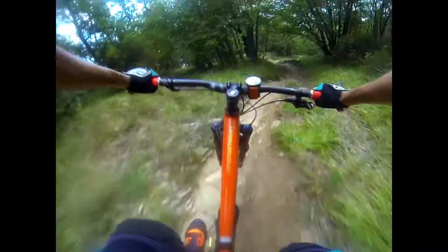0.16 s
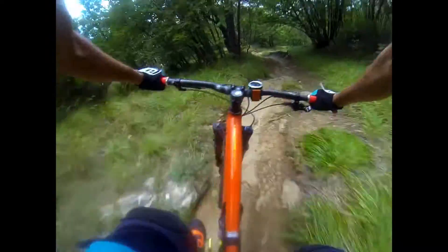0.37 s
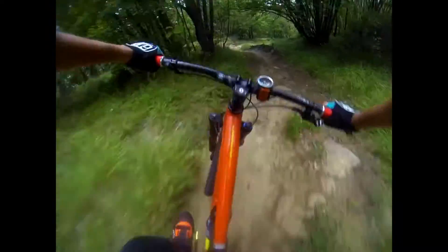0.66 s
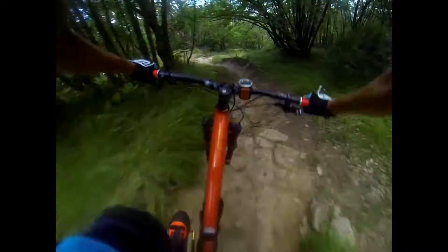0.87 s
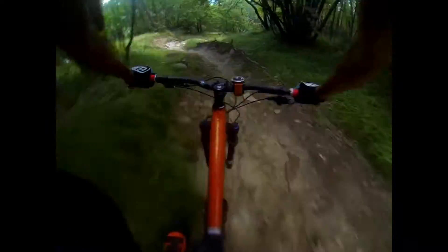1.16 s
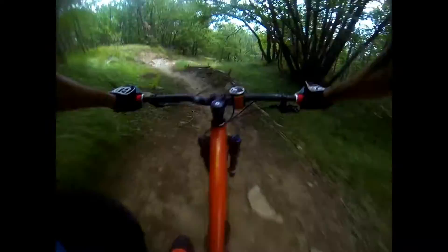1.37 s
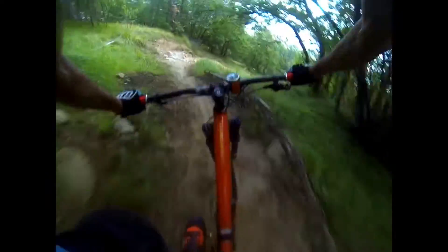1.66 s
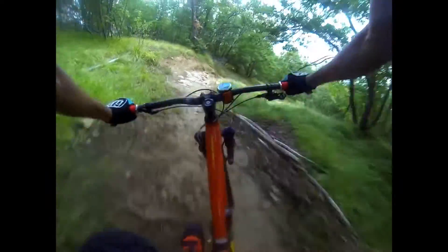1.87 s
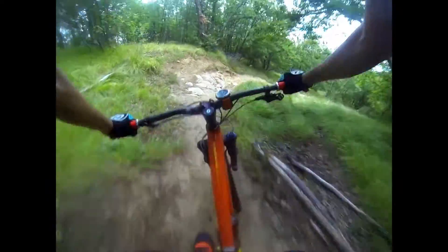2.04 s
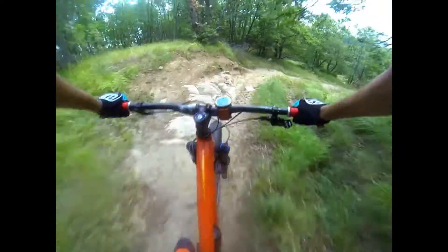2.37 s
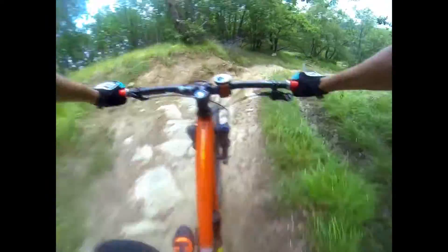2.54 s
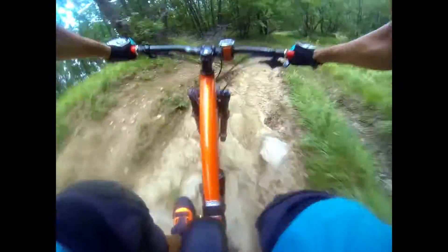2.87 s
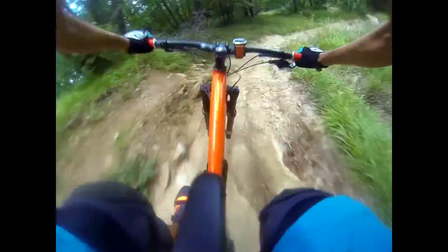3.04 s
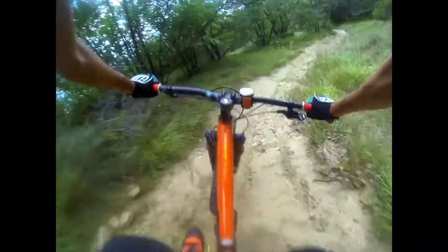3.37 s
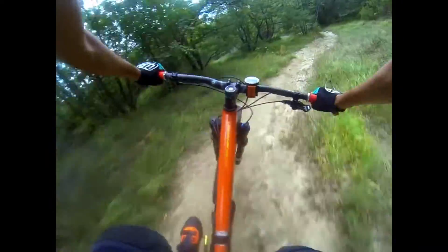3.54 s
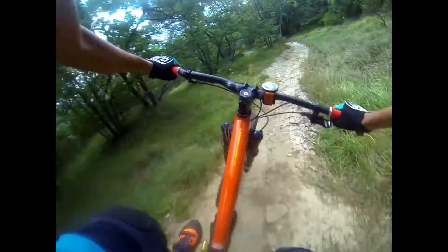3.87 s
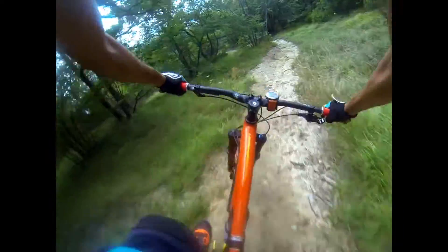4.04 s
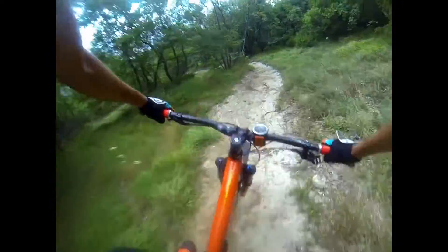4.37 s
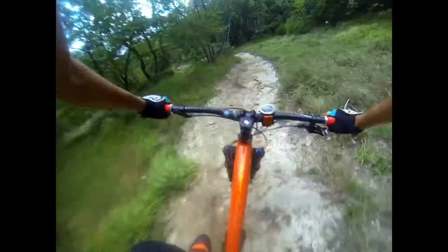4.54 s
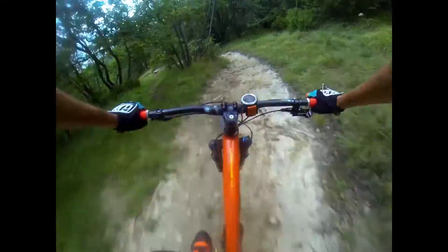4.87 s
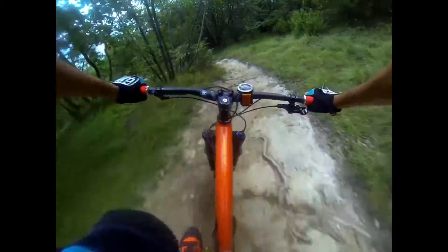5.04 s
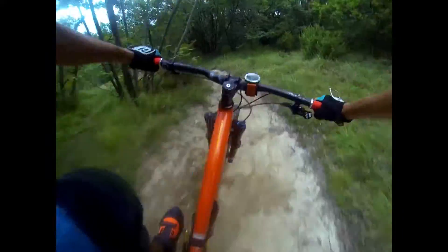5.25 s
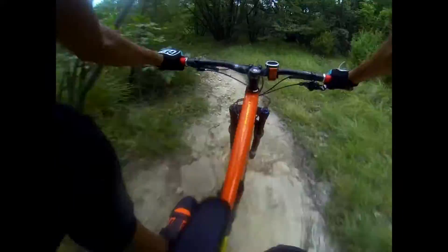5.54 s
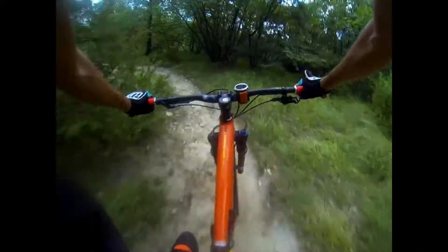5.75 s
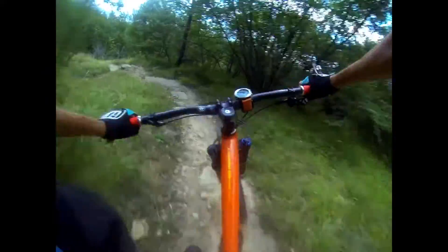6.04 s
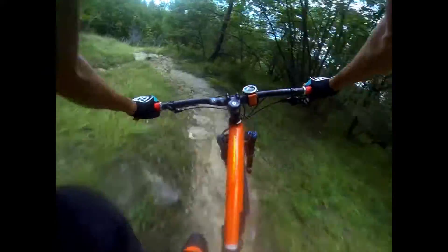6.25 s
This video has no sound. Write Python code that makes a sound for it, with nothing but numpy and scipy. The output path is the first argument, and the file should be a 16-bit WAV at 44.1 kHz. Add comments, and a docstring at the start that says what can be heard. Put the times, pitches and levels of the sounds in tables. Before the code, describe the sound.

A mountain bike speeds down a stony dirt trail, heard closely from a housed microphone on the rider's chest. From 0 to 1.8 s, frame thuds and chain clacks come in quick irregular clusters over rolling tyres, crunching grit and pebble flicks; the hub buzzes briefly at 0.2 s. Around 2 to 2.8 s knocks soften, with another faint buzz. At 2.9 s a landing hits hard with a short low-mid boom, a brief frame hum and more rattling until 3.8 s; a tiny high brake ting and hub buzzes come near 3.5 to 3.8 s. From 3.9 to 4.6 s wind dominates, fluttering strongest near 4.4 s. Scattered knocks follow, then a dense clatter at 5.6 to 5.95 s, easing to tyre roll and rising wind by 6.4 s. Single deep buffets thump near 0.5, 1, 1.9, 4.6, 4.8 and 5.3 s. Open air, dry, slightly boxy.

```python
"""A mountain bike clatters at speed down a rocky dirt trail: chain and frame knock on the stones.
The microphone sits in a camera housing on the rider's chest, close above the bike, in open air.
Knocks are sprays of contacts driven into ringing parts; tyres and grit are coloured random clicks.
The freehub buzzes in spells, the frame hums after a landing and a brake rotor tings, all resonances.
Behind it all wind rumbles and flutters as shaped noise, with a few single large buffets."""
import sys
import numpy as np
from scipy import signal
from scipy.fft import rfft, irfft, next_fast_len
from scipy.io import wavfile
from scipy.ndimage import uniform_filter1d

SR = 44100
rng = np.random.default_rng(int(sys.argv[2]) if len(sys.argv) > 2 else 0)


def master_out(mix):
    """Clip the mix to full scale and print it as 16-bit PCM to the path in sys.argv[1]."""
    frames = np.transpose(np.atleast_2d(mix))
    ceiling = np.clip(frames, -1, 1)
    pcm = np.round(ceiling * 32767).astype(np.int16)
    wavfile.write(sys.argv[1], SR, pcm)


N = 282681
TIME = np.arange(N) / SR


def from_db(db):
    """Decibels to gain."""
    return 10 ** (np.asarray(db) / 20)


def rms_one(x):
    """Scale to unit power."""
    return x / np.sqrt(np.mean(x ** 2) + 1e-20)


def in_time(rows):
    """Each level column of a table, interpolated to every sample."""
    s, *columns = np.transpose(rows)
    return [np.interp(TIME, s, column) for column in columns]


def drift(rate_hz):
    """Random wander of unit power, with straight lines between chance points."""
    knots = rng.standard_normal(4096)
    return rms_one(np.interp(TIME * rate_hz, np.arange(len(knots)), knots))


def colour(x, points):
    """Causal (minimum-phase) filter with the given spectrum, falling steeply past its ends."""
    size = next_fast_len(len(x) + 4096)
    size += size % 2
    hz, db = np.transpose(points)
    octave = np.log2(np.maximum(np.fft.rfftfreq(size, 1 / SR), 1))
    outside = np.abs(octave - np.clip(octave, np.log2(hz[0]), np.log2(hz[-1])))
    # 18 dB per octave past the ends, for up to three octaves
    spectrum_db = np.interp(octave, np.log2(hz), db) - 18 * np.minimum(outside, 3)
    cepstrum = irfft(np.log(from_db(spectrum_db)))
    # folding the cepstrum forward makes the filter minimum-phase
    cepstrum[1:size // 2] *= 2
    cepstrum[size // 2 + 1:] = 0
    return irfft(rfft(x, size) * np.exp(rfft(cepstrum)))[:len(x)]


def resonate(x, hz, width_hz):
    """One resonance with unit gain on top."""
    r = np.exp(-np.pi * width_hz / SR)
    feed = np.array([1, 0, -1]) * (1 - r * r) / 2
    return signal.lfilter(feed, [1, -2 * r * np.cos(2 * np.pi * hz / SR), r * r], x)


def steady(x, span_s):
    """Even out the level over a short span."""
    size = max(int(span_s * SR), 2)
    power = uniform_filter1d(uniform_filter1d(x * x, size), size)
    return x / np.sqrt(np.abs(power) + 1e-12)


def grains(per_s, spread_db, largest):
    """Random clicks of uneven size, up to a largest one, scaled to unit power."""
    sizes = from_db(spread_db * np.minimum(rng.exponential(1, N), largest))
    sizes = sizes * rng.choice([-1, 1], N)
    return rms_one(sizes * (rng.random(N) < per_s / SR))


def spell(start_s, length_s, attack_s, release_s):
    """An envelope that rises, holds and dies away."""
    age = TIME - start_s
    return np.clip(age / attack_s, 0, 1) * np.exp(-np.clip((age - length_s) / release_s, 0, 20))


def clatter(rows, shares, points, t60, crack, rebounds_per_s, ring_db):
    """Each knock is a brief graze, a main contact and a dying spray of rebounds into ringing parts."""
    size, lead = 6144, 256  # samples; the main contact comes after the lead
    age, out = np.arange(size) / SR, np.zeros(N + size)
    since = age - lead / SR
    impulse = 1. * (age == 0)
    body = rfft(colour(impulse, points), 2 * size)
    for (s, rattle_s, db, ring_hz), share in zip(rows, shares):
        force = np.exp(np.where(since < 0, since / 0.0017, -since / max(rattle_s, .001)))
        contacts = rng.choice([-1, 1], size) * rng.uniform(0.54, 1.8, size)
        contacts = contacts * (rng.random(size) < rebounds_per_s / SR) * force
        contacts[lead] = 1
        # a sharp crack, then noise that dies by 60 dB in t60 seconds
        ringing = rng.standard_normal(size) * from_db(-60 * age / t60)
        ringing[0] += crack
        struck_part = impulse + from_db(ring_db) * resonate(impulse, ring_hz, width_hz=160)
        knock = rfft(contacts, 2 * size) * rfft(ringing, 2 * size) * rfft(struck_part, 2 * size)
        knock = irfft(knock * body)[:size]
        at = int(s * SR) - lead
        # a knock's level is its energy spread over a hundredth of a second
        out[at:at + size] += share * from_db(db) * knock / np.sqrt(np.sum(knock ** 2) / (SR / 100))
    return out[:N]


# small knocks between the large ones; level over that of the tyre roll
JIGGLE_OVER_ROLL_DB, JIGGLE_SPREAD_DB = 4, 2
JIGGLE_MEAN_RATTLE_S, JIGGLE_RING_HZ = .005, (800, 2400)


def jiggles(count):
    """Small knocks at chance moments: rows like those of the large ones."""
    when, rattle, size, part = rng.random((count, 4)).T
    s = (np.arange(count) + when) / count * (TIME[-1] - .02) + .01
    roll_db = np.interp(s, TIME, in_time(TRAIL)[0])
    db = roll_db + JIGGLE_OVER_ROLL_DB + JIGGLE_SPREAD_DB * (2 * size - 1)
    low, high = JIGGLE_RING_HZ
    return np.transpose([s, JIGGLE_MEAN_RATTLE_S * (.5 + rattle), db, low * (high / low) ** part])


# chain and frame on the larger stones, close below the microphone:
# [t/s, rattle time/s, level before trims/dB, ring of the struck part f/Hz]
KNOCKS = [(.109, 0.012, -14, 800), (.206, 0.005, -27.5, 1730), (.225, 0.018, -15.5, 1800),
          (.272, 0.013, -18, 1750), (.535, 0.016, -22, 780), (.699, 0.032, -15, 1290),
          (.713, 0.0021, -12, 1000), (.7747, .003, -15.5, 1860), (.8087, 0.0068, -19.5, 1660),
          (.944, .007, -21, 580), (1.081, .007, -16.5, 1920), (1.093, .002, -20, 1500),
          (1.199, 0.014, -19, 1540), (1.2432, .002, -15, 1550), (1.257, 0.0046, -22, 2000),
          (1.31, 0.0064, -14.5, 1460), (1.318, 0.014, -17, 1420), (1.351, 0.011, -15.5, 1600),
          (1.382, 0.0025, -17.5, 785), (1.4143, 0.013, -24.5, 800), (1.4901, .0015, -29, 1890),
          (1.563, 0.027, -16, 900), (1.638, .012, -12, 714), (1.658, .016, -15, 940),
          (1.698, .018, -12, 1030), (1.8134, 0.0015, -19, 746), (2.116, 0.033, -25.5, 2320),
          (2.459, .012, -26.5, 910), (2.496, 0.024, -24.5, 870), (2.7298, 0.0036, -25, 1820),
          (2.7722, 0.0032, -23.5, 2090), (2.867, 0.012, -24.5, 1710), (2.9343, 0.013, -10.5, 1200),
          (2.946, 0.038, -12, 550), (3.018, 0.026, -24, 573), (3.05, 0.022, -14.5, 2000),
          (3.068, .018, -14, 1620), (3.243, .007, -20, 690), (3.28, 0.025, -17.5, 800),
          (3.297, 0.018, -11.5, 850), (3.4726, 0.0061, -25, 1170), (3.549, 0.016, -16.5, 810),
          (3.614, 0.017, -24, 760), (3.7026, 0.023, -14, 1710), (3.791, 0.023, -16.5, 600),
          (3.826, 0.0071, -24, 1200), (3.9196, .009, -30.5, 1390), (4.467, 0.0043, -31.5, 2000),
          (4.6489, 0.0087, -20, 1570), (4.6983, 0.053, -19, 810), (4.891, 0.0039, -15, 1480),
          (4.9772, 0.028, -17.5, 1210), (5.298, 0.0089, -20.5, 656), (5.5519, 0.032, -21.5, 900),
          (5.6651, 0.026, -13, 1700), (5.711, 0.021, -13.5, 1440), (5.757, .012, -10, 1570),
          (5.765, 0.005, -14, 1580), (5.7973, 0.012, -16.5, 1380), (5.8821, 0.0095, -11, 1050),
          (5.9176, 0.04, -15, 1030), (5.935, 0.017, -13, 1750), (6.0383, .008, -30, 2100),
          (6.0976, 0.0076, -25, 846)]
# spectra of frame thud, chain clack and bright tick: [f/Hz, relative level/dB]
THUD_COLOUR = [(200, -12.5), (380, 6), (570, 4.5), (720, 4.5), (1000, 5.5), (1300, -9.5), (1800, -27.5)]
CLACK_COLOUR = [(800, -13.5), (1250, 0.5), (1600, 2), (1950, 3.5), (2400, -7), (2900, -11.5), (3800, -25.5),
                (6000, -46)]
TICK_COLOUR = [(2200, 0.5), (2800, 6), (3800, 0), (5200, -5.5), (7000, -11), (9000, -6), (12000, -19),
               (15000, -25)]
# parts that ring lower mostly thud, higher ones mostly clack
EVEN_RING_HZ, LEAN_DB_PER_OCTAVE = 1310, 9.5
THUD_DB, CLACK_DB, TICK_DB = -0.3, -0.2, -26.5   # trims against a knock's level


def knocks():
    """The frame thuds, the chain clacks against the stay, links tick; the struck part sets the balance."""
    rows = np.vstack([KNOCKS, jiggles(count=40)])
    lean = from_db(LEAN_DB_PER_OCTAVE * np.log2(rows[:, 3] / EVEN_RING_HZ))
    # the two shares add up to the same power whatever the lean
    thud_share, clack_share = 1 / np.hypot(1, lean), lean / np.hypot(1, lean)
    thud = clatter(rows, thud_share, THUD_COLOUR, t60=0.027, crack=11.8, rebounds_per_s=560, ring_db=1.5)
    clack = clatter(rows, clack_share, CLACK_COLOUR, t60=0.02, crack=11.8,
                    rebounds_per_s=700, ring_db=3.0)
    tick = clatter(rows, np.ones(len(rows)), TICK_COLOUR, t60=0.024, crack=4,
                   rebounds_per_s=900, ring_db=-3)
    return from_db(THUD_DB) * thud + from_db(CLACK_DB) * clack + from_db(TICK_DB) * tick


# stones crack against rim and frame: [t/s, level/dB]
STONES = [(.706, -38), (.7747, -26.5), (1.166, -36.5), (1.2432, -35.5), (1.316, -32.5), (1.38, -38),
          (1.58, -39), (1.654, -36), (2.936, -32.5), (3.092, -41), (3.147, -39), (3.214, -31),
          (3.53, -36.5), (4.286, -33), (4.361, -43), (4.9772, -34.5)]
STONE_RATTLE_S, STONE_RING_HZ = 0.0076, 2000


def stone_cracks():
    """A flung stone gives a short, bright tick."""
    rows = [(s, STONE_RATTLE_S, db, STONE_RING_HZ) for s, db in STONES]
    return clatter(rows, np.ones(len(rows)), TICK_COLOUR, t60=0.02, crack=3,
                   rebounds_per_s=1200, ring_db=-6)


# range of pebble pitches: [lowest f/Hz, highest f/Hz]
PEBBLE_PITCH_HZ = (692, 3130)


def pebbles(per_s, spread_db, ring_cycles, count):
    """Small stones flick against tyres and frame, each ringing at one of a set of pitches."""
    clicks, dealt = grains(per_s, spread_db, largest=1.9), rng.integers(0, count, N)
    pitches = np.geomspace(*PEBBLE_PITCH_HZ, count)
    rings = sum(resonate(clicks * (dealt == k) + 1e-18, hz, hz / ring_cycles) / hz
                for k, hz in enumerate(pitches))
    return rms_one(signal.sosfilt(signal.butter(2, 3200, fs=SR, output="sos"), rings))


# tyres on the ground: [t/s, roll level on hard dirt before trims/dB, loose grit level before trims/dB]
TRAIL = [(0, -34.5, -51), (.6, -32, -49.5), (.8, -33, -45.5), (1.05, -34.5, -55.5), (1.48, -36, -51.5),
         (1.7, -32.5, -46.5), (1.96, -37.5, -53), (2.18, -39.5, -60.5), (2.28, -39, -50),
         (2.82, -30.5, -48.5), (3.2, -29.5, -47.5), (3.41, -34.5, -53.5), (3.68, -25, -47.5),
         (3.92, -38, -51), (4.3, -36.5, -46.5), (4.5, -36, -50), (4.9, -33.5, -49.5), (5.55, -33, -49.5),
         (5.87, -27.5, -43.5), (6.05, -40, -48.5), (6.28, -31, -43.5), (6.41, -33.5, -47)]
# spectra of roll, grit and fine sand: [f/Hz, relative level/dB]
ROLL_COLOUR = [(300, -9), (570, 4.5), (750, 3), (1250, -3), (1850, 1.5), (2400, -11.5), (3000, -17),
               (4200, -22), (7000, -60.5)]
GRIT_COLOUR = [(2300, 4), (2900, 9.5), (4000, -1), (5300, -3), (6500, -3), (8000, -26)]
SAND_COLOUR = [(6500, -3), (8600, 2), (11000, -4), (12300, -11), (13200, -5), (15000, -23)]
SAND_UNDER_GRIT_DB = -7   # fine sand sprays along with the grit


def tyres():
    """Knobs patter on hard dirt, crush grit and flick pebbles, in uneven spurts."""
    roll_db, grit_db = in_time(TRAIL)
    ground, crush = drift(rate_hz=70), drift(rate_hz=110)
    patter = grains(per_s=2500, spread_db=3.0, largest=5.0)
    roll = rms_one(colour(patter, ROLL_COLOUR)) * from_db(-1.17 + 2.0 * ground)
    flicks = from_db(-7.5) * pebbles(per_s=170, spread_db=12.0, ring_cycles=6.5, count=14)
    crunch = grains(per_s=7600, spread_db=7.5, largest=2.65)
    grit = rms_one(colour(crunch, GRIT_COLOUR)) * from_db(3.6 * ground + 1.03 * crush - 0.5)
    spray = grains(per_s=12000, spread_db=6.0, largest=2.7)
    sand = rms_one(colour(spray, SAND_COLOUR)) * from_db(2.25 * crush + 1.5 * drift(rate_hz=57))
    loose = grit + sand * from_db(SAND_UNDER_GRIT_DB)
    return (roll + flicks) * from_db(roll_db) + loose * from_db(grit_db)


# spells of freehub buzz: [start t/s, length t/s, level/dB]
FREEHUB = [(.01, 0.032, -32.5), (0.201, 0.11, -25.5), (1.994, .15, -30.5), (2.982, 0.092, -24),
           (3.526, 0.0089, -18.5), (3.609, .23, -23)]
# resonances of the wheel: [f/Hz, width f/Hz, relative level/dB]
HUB_MODES = [(310, 54, -1), (580, 57, 9), (900, 180, 3.5), (1780, 116, 10), (2050, 120, 0.5),
             (2620, 1000, -7.5)]
HUB_ATTACK_S, HUB_RELEASE_S, HUB_WOBBLE_DB = 0.0058, 0.012, 3


def freehub(clicks_hz, uneven_db):
    """Pawls snap over the ratchet and set the wheel ringing."""
    teeth = np.floor(np.cumsum(clicks_hz * (1 + .12 * drift(rate_hz=300))) / SR)
    clicks = np.diff(teeth, prepend=0) * from_db(uneven_db * rng.standard_normal(N))
    drive = rms_one(clicks) + rng.standard_normal(N)   # clicks and noise in equal power
    # neighbouring modes have opposite sign
    wheel = sum((-1) ** k * from_db(db + 3.4 * drift(rate_hz=55)) * resonate(drive, hz, width_hz)
                for k, (hz, width_hz, db) in enumerate(HUB_MODES))
    wheel = signal.sosfilt(signal.butter(6, 2900, fs=SR, output="sos"), wheel)
    level = sum(from_db(db) * spell(s, length_s, HUB_ATTACK_S, HUB_RELEASE_S)
                for s, length_s, db in FREEHUB)
    return steady(wheel, span_s=0.035) * level * from_db(HUB_WOBBLE_DB * drift(rate_hz=40))


# the frame hums after the landing and booms once as the suspension bottoms out
LANDING_S, HUM_S, HUM_DB, HUM_ATTACK_S, HUM_RELEASE_S = 2.934, 0.19, -31, 0.018, .015
BOTTOM_OUT_S, BOOM_S, BOOM_DB = 2.998, 0.0041, -10   # the boom is at half gain BOOM_S from its peak


def frame_hum(hz, width_hz):
    """One strong mode, kept ringing by the shaking after the landing."""
    hum = from_db(HUM_DB) * spell(LANDING_S, HUM_S, HUM_ATTACK_S, HUM_RELEASE_S)
    boom = from_db(BOOM_DB) / (1 + ((TIME - BOTTOM_OUT_S) / BOOM_S) ** 4)
    mode = steady(resonate(rng.standard_normal(N), hz, width_hz), span_s=0.019)
    return (hum + boom) * mode


# the rotor brushes a pad: [t/s, peak level/dB]
TINGS = [(.4036, -54), (.925, -53), (1.4233, -50), (3.365, -55), (3.526, -38.5), (5.1368, -47),
         (5.1932, -53), (5.6731, -45), (5.98, -49)]


def rotor(hz, rise_s):
    """Each brush swells into a short, very high ting."""
    out = np.zeros(N)
    for (s, db), detune in zip(TINGS, rng.normal(0, .004, len(TINGS))):
        start = int(s * SR)
        age = TIME[:N - start][:4096]
        swell = from_db(db) * age / rise_s * np.exp(1 - age / rise_s)
        out[start:][:len(age)] += swell * np.sin(2 * np.pi * hz * (1 + detune) * age)
    return out


# air on the housing: [t/s, rumble level before trims/dB, flutter level above 150 Hz before trims/dB]
WIND = [(0, -26.5, -21), (.18, -24, -32.5), (.5, -13, -24), (.8, -22.5, -28.5), (.97, -10.5, -20),
        (1.12, -21.5, -27), (1.29, -14, -19.5), (1.43, -31.5, -32.5), (1.6, -30, -33), (1.69, -16, -20),
        (1.93, -11.5, -23), (2.08, -18.5, -20.5), (2.27, -14, -25.5), (2.42, -30, -32.5), (2.58, -11, -26),
        (2.7, -16, -29.5), (2.95, -14.5, -20.5), (3.2, -15, -22.5), (3.33, -11.5, -21), (3.45, -22, -29),
        (3.6, -33.5, -29), (3.9, -30, -34.5), (4, -22, -35.5), (4.2, -13, -17.5), (4.39, -10, -11.5),
        (4.52, -20.5, -42), (4.62, -16.5, -23), (4.95, -10.5, -19.5), (5.06, -19, -26), (5.18, -10, -23),
        (5.33, -18.5, -23), (5.46, -26, -30.5), (5.66, -13.5, -24), (6.05, -28, -34), (6.41, -10, -28)]
# spectrum of the wind: [f/Hz, relative level/dB]
WIND_COLOUR = [(20, 0), (40, 6), (90, 0.5), (160, -8.5), (285, -12), (480, -23), (800, -30), (1300, -40.5),
               (2500, -45.5)]
LUMPS_HZ, LUMPS_DB = 16, 2.4   # rate and spread of the uneven flow


def wind():
    """Slow eddies rumble; small fast ones flutter on the crests of the large."""
    rumble_db, flutter_db = in_time(WIND)
    flow = colour(rng.standard_normal(N), WIND_COLOUR)
    slow = signal.sosfilt(signal.butter(4, 150, "low", fs=SR, output="sos"), flow)
    slow = steady(slow, span_s=0.097)
    fast = signal.sosfilt(signal.butter(4, 150, "high", fs=SR, output="sos"), flow)
    fast = steady(fast * from_db(1.56 * np.abs(slow)), span_s=0.14)
    # the rider's body jolts in and out of the flow
    lumps = from_db(LUMPS_DB * np.minimum(drift(rate_hz=LUMPS_HZ), 1))
    return lumps * (slow * from_db(rumble_db - 1.23) + fast * from_db(flutter_db - 1.02))


# single large eddies at the housing: [t/s, peak level/dB, swing f/Hz]
BUFFETS = [(.491, -4.5, 45), (0.98, -3.5, 74), (1.878, -6, 90), (4.591, -4.5, 60), (4.771, -3.5, 90),
           (5.311, -3, 60.3)]


def buffets():
    """A large eddy sucks and then pushes, once."""
    out = np.zeros(N)
    for s, db, hz in BUFFETS:
        turn = 2 * np.pi * hz * (TIME - s)
        near = np.abs(turn) < 2 * np.pi
        out[near] += from_db(db) * turn[near] * np.exp((1 - turn[near] ** 2) / 2)
    return out


def scene():
    """Bike, ground and wind ride along with the chest microphone, in open air."""
    bike = knocks() + stone_cracks() + freehub(clicks_hz=286.7, uneven_db=4.5)
    bike = bike + frame_hum(hz=573, width_hz=2.9) + rotor(hz=13030, rise_s=0.0037)
    return (bike + tyres() + wind() + buffets())[None]


# resonances and hollows of the camera housing: [f/Hz, width f/Hz (narrowed for boosts), level/dB]
HOUSING = [(543, 56, 3), (4490, 250, -7), (5200, 640, 10), (7230, 4600, -10.5), (8620, 490, 7.5),
           (9700, 680, -7), (10970, 540, 3)]
CUTOFF_HZ = 15200


def record(dry):
    """The housing colours the sound at the microphone, peaks are rounded, the top is cut."""
    for hz, width_hz, db in HOUSING:
        if db > 0:
            width_hz = width_hz / from_db(db / 2)
        dry = dry + (from_db(db) - 1) * resonate(dry, hz, width_hz)
    top = 0.85
    rounded = dry / (1 + (dry / top) ** 6) ** (1 / 6)
    return signal.sosfilt(signal.ellip(10, .2, 80, CUTOFF_HZ, fs=SR, output="sos"), rounded)


dry = scene()
out = record(dry)
master_out(out)
```